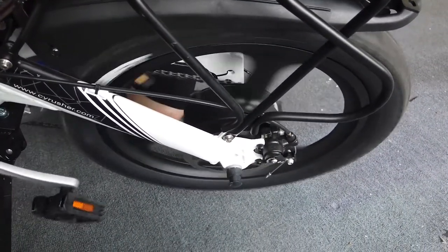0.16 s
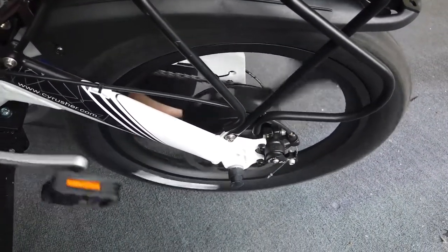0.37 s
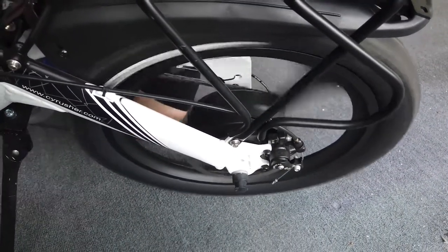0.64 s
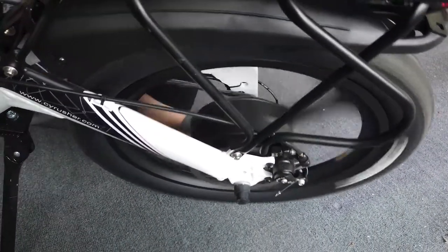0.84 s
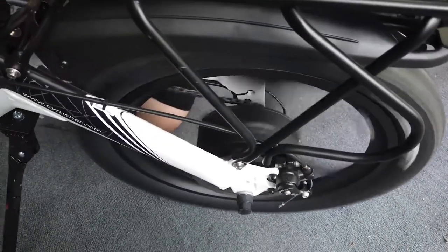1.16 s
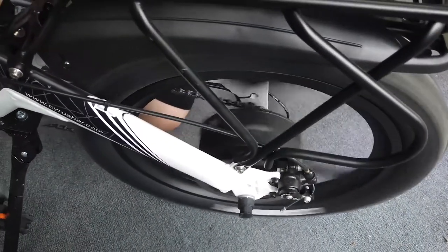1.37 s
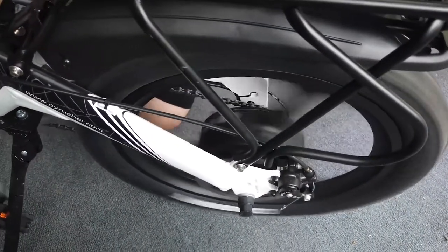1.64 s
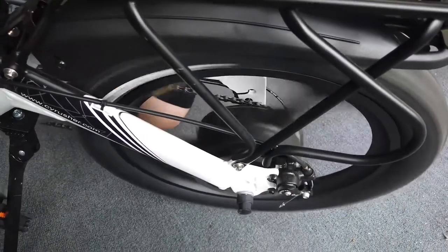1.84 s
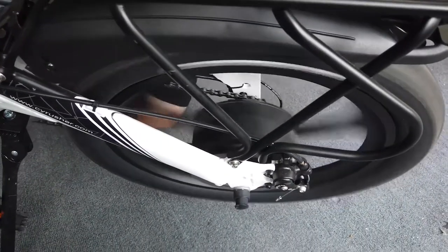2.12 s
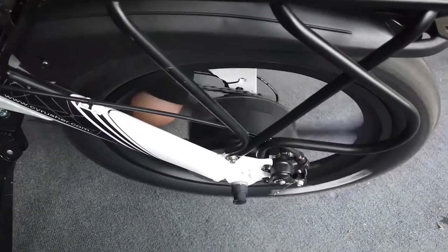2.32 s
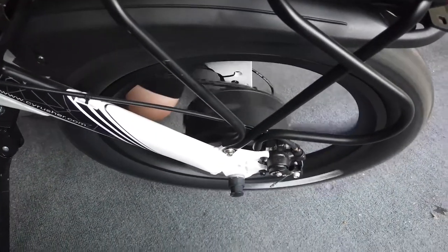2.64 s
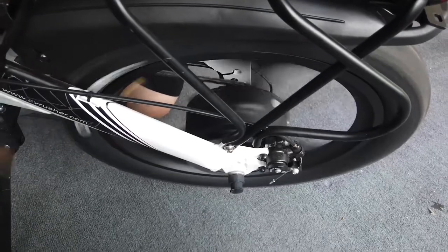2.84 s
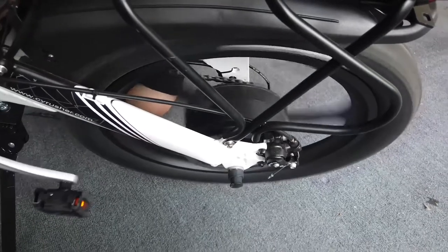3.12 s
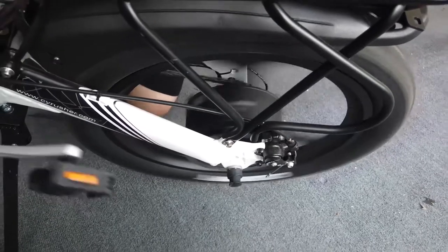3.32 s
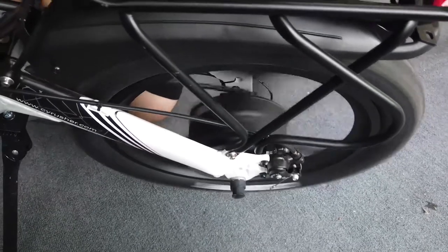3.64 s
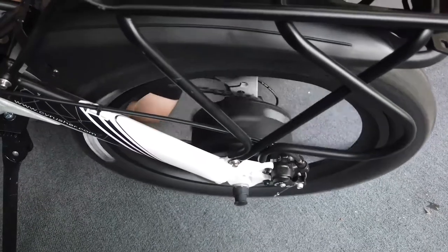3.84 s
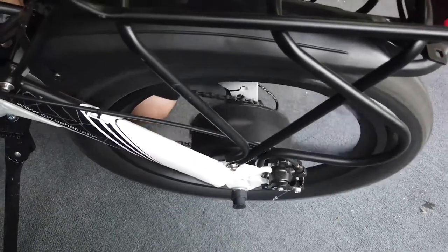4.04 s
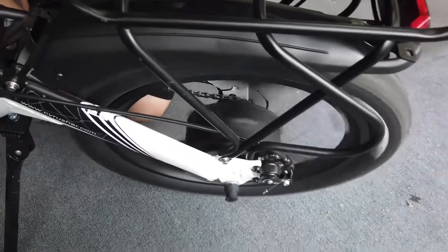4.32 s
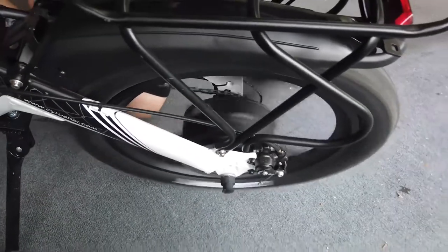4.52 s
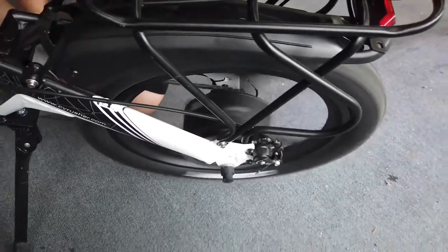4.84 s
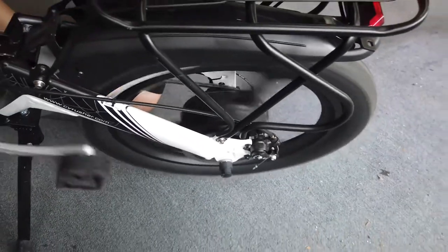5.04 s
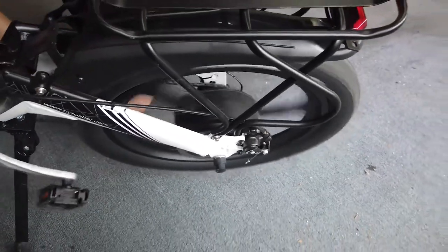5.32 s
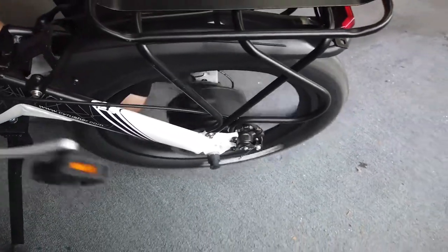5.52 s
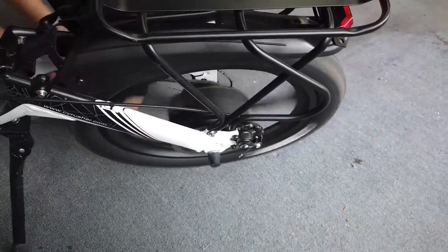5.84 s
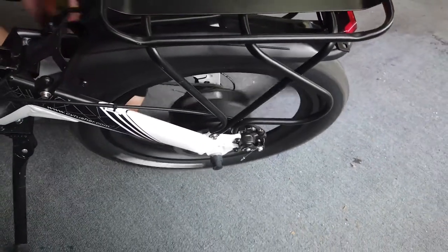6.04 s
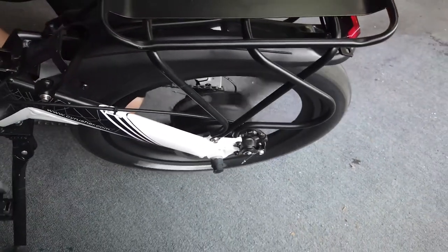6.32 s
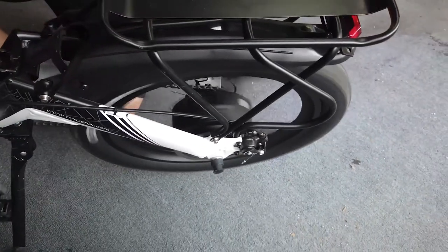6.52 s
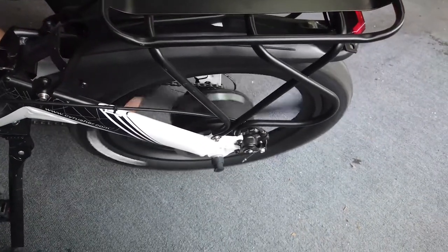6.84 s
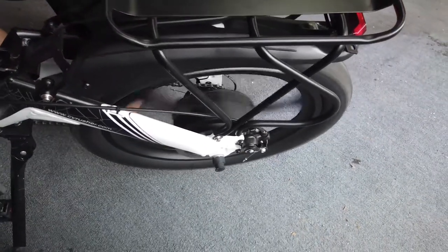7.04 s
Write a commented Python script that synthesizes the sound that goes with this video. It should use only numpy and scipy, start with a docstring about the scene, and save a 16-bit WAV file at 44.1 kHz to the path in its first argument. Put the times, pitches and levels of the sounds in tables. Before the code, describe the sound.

The rear wheel of an electric bike spins on a stand in a small, hard room, heard from close by. The chain rattles and the hub motor whirs with a thin whine, then coasts. The freewheel buzzes in three runs, its clicking speeding up and slowing down in the first two. Metal clanks from chain and cranks come as the drive catches, loudest before the last run, over a low rumble.

```python
"""A geared hub motor whirs and a chain rattles over a low rumble: the rear wheel of an electric bike
spins on its stand in a small hard room. The motor whines under load, then coasts. Three times the
freewheel runs free and its pawls buzz over the ratchet teeth, twice as fast when the pedals turn
backwards. Chain and cranks clank through the frame as the drive catches and lets go."""
import sys
import numpy as np
from scipy import signal
from scipy.fft import rfft, irfft, next_fast_len
from scipy.io import wavfile
from scipy.ndimage import map_coordinates

SR = 44100
rng = np.random.default_rng(int(sys.argv[2]) if len(sys.argv) > 2 else 0)


def put_to_file(sound):
    """Save the sound as 16-bit audio at rate SR, in the file named by the first command-line argument."""
    columns = np.atleast_2d(sound).T  # one column per channel
    safe = np.clip(columns, -1, 1)
    whole_steps = np.round(safe * 32767)
    wavfile.write(sys.argv[1], SR, whole_steps.astype(np.int16))


N = 316638


def amp(db):
    """Decibels to gain."""
    return 10 ** (np.asarray(db) / 20)


def unit(x):
    """x at rms 1."""
    return x / np.sqrt(np.mean(x ** 2) + 1e-20)


def along(points, hz):
    """Read (freq_hz, value) breakpoints on a log frequency axis."""
    freqs, values = np.transpose(points)
    return np.interp(np.log(hz + 1), np.log(freqs + 1), values)


def curves(rows):
    """One automation curve for each column after the time."""
    times, *columns = np.transpose(rows)
    return [np.interp(np.arange(N) / SR, times, column) for column in columns]


def swell(start, attack, hold, t60):
    """An envelope that rises, holds and dies away."""
    t = np.arange(N) / SR - start
    return np.clip(t / attack, 0, 1) * amp(-60 * np.maximum(t - attack - hold, 0) / t60)


def levels(rows):
    """One envelope per dB column after (start, attack, hold, t60); overlapping swells add in power."""
    rows = np.array(rows)
    shapes = np.array([swell(*row) for row in rows[:, :4]])
    return np.sqrt(amp(rows[:, 4:].T) ** 2 @ shapes ** 2)


def wobble(rate):
    """A smooth random curve, rate knots a second."""
    knots = rng.standard_normal(int(N * rate / SR) + 4)
    return map_coordinates(knots, [np.arange(N) * rate / SR])


def tone(hz, waver_hz, rate):
    """A sine whose pitch wavers, in mid and side."""
    pitch = hz + waver_hz * np.array([wobble(rate), wobble(rate)])
    return np.sqrt(2) * np.sin(2 * np.pi * (np.cumsum(pitch, axis=1) / SR + rng.random((2, 1))))


def bursts(starts, sizes, t60, rise=0.00035):
    """A short burst of noise (mid and side) at each start sample."""
    blows = np.bincount(np.clip(starts, 0, N - 1).astype(int), sizes, N)
    t = np.arange(SR // 10) / SR
    fade = amp(-60 * t / t60) * (1 - np.exp(-t / rise)) ** 2
    return signal.oaconvolve(blows, fade / fade.max())[:N] * rng.standard_normal((2, N))


def contacts(scatter_db, count=9000, t60=0.0076):
    """Dense small impacts, uneven in time and strength."""
    return bursts(rng.uniform(0, N, count), amp(scatter_db * rng.standard_normal(count)), t60)


def filtered(x, gain):
    """Equalise x with a gain that is a function of frequency."""
    n = x.shape[-1]
    size = next_fast_len(n + SR // 8)
    return irfft(rfft(x, size) * gain(np.fft.rfftfreq(size, 1 / SR)), size)[..., :n]


def resonate(x, modes, size=4096):
    """x rings a body with steep-sided modes; their levels set only the balance between them."""
    hz = np.fft.rfftfreq(size, 1 / SR)
    power = sum((amp(db) * (hz * width) ** 2 / ((centre ** 2 - hz ** 2) ** 2 + (hz * width) ** 2)) ** 2
                for centre, width, db in modes)
    # minimum phase, so the ring never comes before the blow
    cepstrum = irfft(np.log(power / power.max() + 1e-10) / 2)
    cepstrum[1:size // 2] *= 2
    cepstrum[size // 2 + 1:] = 0
    ring = irfft(np.exp(rfft(cepstrum)))
    return signal.oaconvolve(x, ring[None] / np.linalg.norm(ring), axes=1)[:, :x.shape[1]]


def wavering(x, modes, tilt_db=0, waver_db=2.5):
    """x rings modes that each wax and wane on their own, summed to rms 1. The tilt is per octave."""
    centre = np.mean([hz for hz, *_ in modes])
    ring = np.zeros((2, N))
    for hz, width, db in modes:
        gain = amp(db + tilt_db * np.log2(hz / centre) + waver_db * wobble(20))
        ring += gain * resonate(x * rng.choice([-1, 1], N), [(hz, width, 0)])
    return unit(ring)


# Reverb time of the hard room: freq_hz, t60_s
ROOM_DECAY = [(150, 1), (700, 0.46), (2000, 0.78), (4000, 0.53), (8000, 0.077), (16000, 0.39)]

def room(x, count=12):
    """The walls answer, each frequency dying at its own speed; crossfaded tails make the echoes drift."""
    hop = N // count + 1
    wet = np.zeros((2, N + 3 * SR))
    padded = np.pad(x, ((0, 0), (hop, 2 * hop)))
    hz, t, noise = signal.stft(rng.standard_normal((count + 1, 2, SR * 3 // 4)), SR, nperseg=256)
    tails = signal.istft(noise * amp(-60 * t / along(ROOM_DECAY, hz)[:, None]), SR, nperseg=256)[1]
    tails /= np.sqrt(np.sum(amp(-120 * np.arange(SR) / SR / along(ROOM_DECAY, 2000))))
    for k, tail in enumerate(tails):
        send = padded[:, k * hop:(k + 2) * hop] * signal.windows.cosine(2 * hop)
        echo = signal.fftconvolve(send, tail, axes=1)
        wet[:, k * hop + SR // 200:][:, :echo.shape[1]] += echo  # 5 ms pre-delay
    return wet[:, hop:hop + N]


# Colour of the room tone before its low cut: freq_hz, relative_db
ROOM_TONE_EQ = [(12, -39), (20, 10), (54, -2.5), (173, -21), (242, -10), (330, -12.5), (585, -18.5),
                (1000, -27), (1300, -19.5), (1930, -32.5), (2380, -20.5), (3000, -67), (3900, -90.5),
                (6600, -120)]
# Colour of the rumble: freq_hz, relative_db
RUMBLE_EQ = [(15, -13.5), (30, -4), (42, 3), (58, -4.5), (90, -10.5), (130, -20), (190, -27), (400, -47.5)]
# Swells of the rumble: start_s, attack_s, hold_s, t60_s, level_db
RUMBLE_SWELLS = [(-0.1, 0.043, 1.36, 7.8, -53), (3.28, 0.082, 0.71, 1.4, -58.5),
                 (4.08, 0.12, 0.02, 0.77, -50), (5.3, 0.021, 0.44, 5.2, -48.5)]

def background(bed_db=-61, waver_db=2.5, air_db=-72):
    """A low rumble swells and sinks under faint, steady room tone."""
    swells, = levels(RUMBLE_SWELLS)
    rumble_gain = np.hypot(amp(bed_db), swells) * amp(waver_db * wobble(5.2))
    rumble = filtered(rng.standard_normal((2, N)),
                      lambda hz: amp(along(RUMBLE_EQ, hz)) * (hz < RUMBLE_EQ[-1][0]))
    air = filtered(rng.standard_normal((2, N)),
                   lambda hz: amp(along(ROOM_TONE_EQ, hz)) * hz ** 2 / (hz ** 2 + 200 ** 2))
    return rumble_gain * unit(rumble) + amp(air_db) * unit(air)


# Deep bumps in the rumble: start_s, pitch_hz, level_db
LOW_BUMPS = [(4.125, 49.3, -37.5), (4.184, 89.3, -43.5), (4.24, 61, -44.5), (4.32, 45.8, -47)]

def bumps():
    """A few deep, short bumps in the rumble, like handling or wind on the microphone."""
    t = np.arange(N) / SR
    return sum(amp(db) * swell(s, attack=0.0185, hold=0.0052, t60=0.2) * np.sin(2 * np.pi * hz * (t - s))
               for s, hz, db in LOW_BUMPS)


# Low resonances of the stand: pitch_hz, width_hz, relative_db
STAND_HUM_MODES = [(239.7, 16, 5), (334, 57, -7.5)]
# Jolts from the drive: start_s, level_db
DRIVE_JOLTS = [(0.238, -63), (0.83, -58), (1.341, -68), (3.64, -64.5)]

def stand(coupling_db=-23):
    """The stand hums in its low modes with the shaking of the gears and with each jolt."""
    shaking = amp(coupling_db) * levels(HUB_WHIRRS)[0]
    jolts = sum(amp(db) * swell(s, attack=0.021, hold=0.061, t60=1) for s, db in DRIVE_JOLTS)
    hum = unit(resonate(rng.standard_normal((2, N)), STAND_HUM_MODES, size=16384))
    return (shaking + jolts) * hum


# Resonances of the chain's links and rollers: pitch_hz, width_hz, relative_db
LINK_MODES = [(1840, 220, 8), (2230, 180, 12), (2500, 41, 11), (2666, 68, 2), (2910, 91, 3),
              (3177, 60, -7.5), (3900, 80, -24), (4100, 80, -17)]
ROLLER_MODES = [(4110, 55, -0.5), (8900, 340, -2.5), (10800, 560, 14.5), (14700, 630, -13.5)]
# Pulls on the chain: start_s, attack_s, hold_s, t60_s, rattle_db, sizzle_db
CHAIN_PULLS = [(-0.03, 0.027, 0.0041, 0.42, -49, -110), (0.35, 0.28, 0.11, 0.4, -102, -88),
               (0.68, 0.065, 0.68, 0.15, -61, -79), (0.85, 0.074, 0.085, 1.2, -71, -65.5),
               (3.45, 0.12, 0.48, 0.3, -99, -96.5), (5.55, 0.074, 0.028, 1.4, -53.5, -100),
               (5.74, 0.05, 0.26, 4.6, -70.5, -115)]

def chain():
    """Links rattle over the sprockets and their rollers sizzle."""
    rattle_gain, sizzle_gain = levels(CHAIN_PULLS)
    ticks = contacts(scatter_db=1.0, count=4000, t60=0.016)
    rattle = rattle_gain * unit(resonate(ticks, LINK_MODES))
    sizzle = sizzle_gain * unit(resonate(ticks, ROLLER_MODES))
    return rattle + sizzle + amp(-6.0) * room(rattle + sizzle)


# Resonances of the frame: pitch_hz, width_hz, relative_db
FRAME_MODES = [(178, 170, 8), (350, 440, 5.5), (476, 46, 11.5), (750, 330, 2.5), (890, 160, 3.5),
               (1265, 190, 4), (1580, 62, -7), (1736, 410, 3), (1940, 240, 0), (2030, 390, -0.5),
               (2373, 140, 9.5), (2640, 95, -20), (3170, 790, -2), (3940, 270, -2.5), (4630, 110, -4),
               (5600, 440, -18), (5670, 460, -9.5), (7200, 1500, -17)]
# Hits of chain and crank: start_s, clatter_db, centre_hz, spread_octaves, t60_s, send_db, thud_db
DRIVE_CLANKS = [(0.794, -45, 1130, 0.5, 0.087, 5, -51.5), (1.387, -33, 796, 0.75, 0.062, -1.5, -59),
                (1.448, -28, 1390, 1, 0.014, -15.5, -52.5), (3.283, -48, 2270, 0.096, 0.059, -17, -77),
                (3.321, -37, 1970, 0.19, 0.097, -22, -37.5), (3.342, -41.5, 1230, 0.36, 0.11, -26, -60),
                (3.373, -44, 2140, 0.081, 0.027, 1.5, -63), (3.851, -56.5, 1167, 0.22, 0.078, -1, -84),
                (3.883, -61, 1850, 0.26, 0.14, -8.5, -74), (3.984, -45, 1755, 0.061, 0.04, -10, -85),
                (4.041, -47.5, 900, 0.9, 0.13, 4.5, -58.5), (4.345, -54, 474, 0.4, 0.15, -11.5, -64),
                (4.785, -55.5, 864, 0.6, 0.1, -4.5, -70.5), (5.301, -20.5, 4100, 0.7, 0.017, 1.5, -44),
                (5.304, -31.5, 1500, 0.18, 0.12, -24, -51.5), (5.326, -49, 516, 0.77, 0.089, -9.5, -42),
                (5.354, -39, 1300, 1, 0.065, -14.5, -41.5), (5.488, -18, 2100, 0.77, 0.017, 1.5, -51.5),
                (5.492, -18.5, 1360, 0.9, 0.04, 0.5, -37.5), (5.513, -26, 1470, 0.3, 0.038, -24, -47),
                (5.524, -28.5, 1490, 0.87, 0.04, -3.5, -42), (6.263, -42.5, 2380, 0.12, 0.043, 8.5, -67),
                (6.299, -25, 1100, 1.1, 0.042, 2.5, -39), (6.315, -27, 1690, 0.7, 0.036, -27, -45),
                (6.359, -39.5, 796, 1.12, 0.07, 6, -55), (7.02, -64.5, 696, 0.33, 0.14, 9, -70)]

def clanks(makeup_db=4.0, thud_lag_s=0.0067):
    """Clattering links ring one band of the frame, then a low thud follows; makeup_db lifts both."""
    direct, send = np.zeros((2, 2, N + SR))
    t = np.arange(SR // 3) / SR

    def strike(s, db, centre_hz, octaves, t60, send_db):
        """One blow on the frame, and its reverb send."""
        frame = resonate(rng.standard_normal((2, len(t))), FRAME_MODES)
        band = filtered(frame, lambda hz: np.exp(-(np.log2((hz + 1) / centre_hz) / octaves) ** 2 / 2))
        blow = unit(band) * amp(db + makeup_db - 60 * t / t60) * (1 - np.exp(-t / 0.0017))
        direct[:, round(s * SR):][:, :len(t)] += blow
        send[:, round(s * SR):][:, :len(t)] += amp(send_db) * blow

    for s, clatter_db, centre_hz, octaves, t60, send_db, thud_db in DRIVE_CLANKS:
        strike(s, clatter_db, centre_hz, octaves, t60, send_db)
        strike(s + thud_lag_s, thud_db, centre_hz=480, octaves=1, t60=0.13, send_db=-17.5)
    return direct[:, :N] + room(send[:, :N])


# Partials of the crank: pitch_hz, relative_db, t60_s
CRANK_MODES = [(475, -12.5, 0.2), (951, -3, 0.25), (1247, -6.5, 0.257), (1550, -12, 0.2),
               (1753, -7.5, 0.25), (1830, -7.5, 0.34), (1906, 2.5, 0.15), (2362, -12.5, 0.12),
               (4086, -8, 0.094)]
# Hard catches of the drive: start_s, strength_db
DRIVE_CATCHES = [(5.303, -48), (5.492, -23.5), (6.3, -43)]

def crank():
    """The hardest catches leave the crank ringing in its own modes."""
    ring = np.zeros((2, N))
    for hz, mode_db, t60 in CRANK_MODES:
        envelope = sum(amp(db + mode_db) * swell(s, 0.002, 0, t60) for s, db in DRIVE_CATCHES)
        ring += envelope * tone(hz, waver_hz=34.24, rate=160)
    return ring * amp([[-3], [-6]])  # mid and side trims


# Path of the motor's whine: time_s, base_hz, lower_db, upper_db
WHINE_PATH = [(0.45, 1281, -80, -89), (0.7, 1300, -57.5, -82), (0.87, 1296, -60, -74),
              (1.06, 1316, -52.5, -66.5), (1.2, 1258, -52, -66.5), (1.33, 1318, -52, -66.5),
              (1.52, 1280, -49.5, -59.5), (1.65, 1297, -67.5, -77.5), (1.9, 1327, -54, -58),
              (2.25, 1305, -62, -61.5), (2.45, 1289, -56.5, -48.5), (2.75, 1258, -57, -56.5),
              (3.1, 1239, -64, -66.5), (3.3, 1220, -96, -98.5)]

def whine(waver_db=3.5):
    """Two narrow, unsteady tones follow the speed of the motor and sink as the wheel coasts."""
    base_hz, lower_db, upper_db = curves(WHINE_PATH)
    return sum(amp(db + waver_db * wobble(30)) * tone(ratio * base_hz, waver_hz=24.18, rate=80)
               for ratio, db in [(0.99, lower_db), (1.315, upper_db)])


# Resonances of gear housing, wheel and hub shell: pitch_hz, width_hz, relative_db
HOUSING_MODES = [(252, 75, -16.5), (467, 116, 1.5), (613, 33, 1), (856, 140, 1.5), (1027, 120, 2.5),
                 (1411, 140, -2), (1600, 150, -29), (2000, 100, -24.5), (2820, 640, -52)]
WHEEL_MODES = [(696, 155, -3.5), (805, 65, -12.5)]
SHELL_MODES = [(1129, 110, -1), (1215, 74, -2), (1280, 42, -1.5), (1361.5, 73, 0.5), (1474, 66, -5),
               (1652, 120, -2.5), (1722, 50, -6.5)]
# Bursts of whirr from the hub: start_s, attack_s, hold_s, t60_s, gears_db, wheel_db, shell_db
HUB_WHIRRS = [(-0.03, 0.012, 0.019, 0.95, -44, -49.5, -44.5), (0.0, 0.1, 0.89, 8.2, -57, -78, -67.5),
              (0.62, 0.57, 0.31, 3.25, -50, -54.5, -46), (1.4, 0.42, 0.83, 1.98, -81, -59, -50.5),
              (3.55, 0.2, 0.12, 0.66, -76, -76.5, -72), (4.03, 0.12, 0.11, 2.4, -58.5, -74, -74.5),
              (4.6, 0.096, 0.083, 7.1, -72.5, -74, -70), (5.6, 0.086, 0.049, 3.56, -64.5, -60.5, -74),
              (6.35, 0.21, 0.068, 0.46, -56.5, -52, -65), (6.85, 0.096, 0.033, 0.92, -68.5, -63.5, -69)]

def motor():
    """Gear teeth rattle unevenly into the housing; the wheel drones and the hub shell sings along."""
    gear_gain, wheel_gain, shell_gain = levels(HUB_WHIRRS)
    gears = gear_gain * unit(resonate(contacts(scatter_db=3.0), HOUSING_MODES))
    wheel = wheel_gain * unit(resonate(contacts(scatter_db=2.5), WHEEL_MODES))
    shell = shell_gain * wavering(contacts(scatter_db=0.5), SHELL_MODES)
    whirr = gears + wheel + shell
    return whirr + amp(-3.5) * room(whirr)


# Moments when the freewheel body sings out: peak_s, pitch_hz, level_db
BODY_FLARES = [(2.5, 2350, -38.5), (2.63, 2350, -46.5), (2.819, 2342, -37), (2.91, 2320, -47),
               (3.15, 2384, -44), (4.43, 2370, -44.5), (4.73, 2280, -41), (4.888, 1820, -44.5),
               (5.06, 2335, -42.5)]

def flares(clicks, half_length_s=0.037, width_hz=216):
    """The clicks briefly drive one mode of the freewheel body into a loud ring."""
    t = np.arange(N) / SR
    ring = np.zeros((2, N))
    for s, hz, db in BODY_FLARES:
        envelope = amp(db) * np.exp(-((t - s) / half_length_s) ** 2)
        ring += envelope * unit(resonate(clicks, [(hz, width_hz, 0)]))
    return ring


# Accents where a pawl drops hard: start_s, body_drive_db, steel_drive_db
HARD_DROPS = [(1.202, -46.5, -40), (1.231, -42, -47), (1.254, -39, -57), (1.28, -42.5, -51),
              (1.3, -41, -38), (1.380, -43, -38), (1.429, -41, -36), (1.447, -36, -36), (1.506, -38.5, -32),
              (1.549, -40, -35), (1.597, -41, -34), (1.686, -36.5, -34), (1.838, -40.5, -36),
              (1.901, -42, -38), (1.962, -43, -50.5), (1.976, -35.5, -47), (2.12, -41.5, -49),
              (2.183, -38.5, -38), (2.302, -41, -46), (2.457, -44, -31.5), (3.985, -77, -60),
              (4.099, -40, -51), (4.114, -37, -49), (4.244, -40.5, -53), (4.393, -39.5, -52),
              (4.405, -50, -59), (4.452, -42, -57), (4.552, -40, -45), (4.769, -45, -29), (6.634, -42, -50),
              (6.645, -35, -40), (6.916, -43, -41)]

def snaps():
    """A hard drop cracks through the freewheel body, the ratchet ring and the pawl's own steel."""
    s, body_db, steel_db = np.transpose(HARD_DROPS)
    parts = [(body_db, BODY_MODES), (body_db - 10, RATCHET_MODES), (steel_db - 4, PAWL_MODES)]
    return sum(resonate(bursts(s * SR, amp(db), t60=0.023, rise=0.0009), modes) for db, modes in parts)


def ratchet_teeth(rate):
    """The samples at which a tooth passes, nudged so that every hard drop falls on a tooth."""
    passed = np.cumsum(rate) / SR
    hard = np.sort([s * SR for s, *_ in HARD_DROPS])
    slip = np.unwrap(np.interp(hard, np.arange(N), passed) % 1, period=1)
    aligned = passed - np.interp(np.arange(N), hard, slip)
    return np.flatnonzero(np.diff(np.floor(aligned)) > 0)


# Runs where the wheel overruns the chain: start_s, end_s, attack_s, release_s, ring_db,
# tilt_db_per_octave, hiss_db, rasp_db, ping_db, bite_db, wheel_hz, sway_peak_s, ping_peak_s
FREE_RUNS = [(1.13, 3.327, 0.067, 0.29, -49, 3.5, -48.5, -60.5, -58, 7.5, 3.28, 2.005, 1.7),
             (3.942, 5.557, 0.19, 0.25, -46.5, -5.5, -49, -59.5, -56.5, -1, 3.15, 4.73, 3.6),
             (6.189, 7.423, 0.11, 0.31, -46.5, 4.5, -50.5, -65.5, -55, 5.5, 3.62, 5.5, 6.66)]

def pawl_controls(rate, bite_s=0.45, slowing_per_s=0.1):
    """Gains of ring, hiss, rasp and ping, and the body's tilt; the untrue wheel sways the levels."""
    t = np.arange(N) / SR
    octaves = np.log2(rate / np.median(rate))  # faster clicks: more hiss and ping, less rasp
    controls = np.zeros((5, N))
    for (start, end, attack, release, ring_db, tilt_db, hiss_db, rasp_db, ping_db,
         bite_db, wheel_hz, sway_peak_s, ping_peak_s) in FREE_RUNS:
        fade_out = np.clip((end - t) / release, 0, 1)
        fade = lambda rise: (np.clip((t - start) / rise, 0, 1) * fade_out) ** 2.05
        angle = lambda s: 2 * np.pi * wheel_hz * (t - s) * (1 - slowing_per_s * (t - s) / 2)
        # ring, rasp and ping swell once, twice and three times a turn
        ring_sway_db = 1.8 * np.cos(angle(sway_peak_s))
        rasp_sway_db = 3.5 * np.cos(2 * angle(sway_peak_s))
        ping_sway_db = 3 * np.cos(3 * angle(ping_peak_s))
        bite = bite_db * np.exp(-((t - start) / bite_s) ** 2)  # trades ping for rasp as a run opens
        late_fade = fade(attack * 1.66)
        controls += [fade(attack) * amp(ring_db + ring_sway_db),
                     late_fade * amp(hiss_db + 0.5 * octaves),
                     late_fade * amp(rasp_db - octaves + rasp_sway_db + bite),
                     late_fade * amp(ping_db + 0.5 * octaves + ping_sway_db - bite / 2),
                     tilt_db * ((t > start) & (t < end))]
    return controls


# Resonances of freewheel body, ratchet ring, steel pawls and spring: pitch_hz, width_hz, relative_db
BODY_MODES = [(1822, 197, -6), (2080, 270, -4.5), (2352, 270, 0), (2676, 370, -1)]
RATCHET_MODES = [(3216, 350, 0), (3850, 200, -3), (4037, 190, 1), (4392, 92, -3.5)]
PAWL_MODES = [(6755, 200, -15), (8140, 283, 5.5), (8500, 400, 4.5), (8930, 350, 2), (9870, 450, 3.5),
              (10540, 630, 4), (10920, 620, 5), (11600, 430, 3.5), (12050, 780, 6.5), (14400, 810, -8.5),
              (15150, 1500, 1.5), (15650, 610, 0)]
SPRING_MODES = [(4475, 57, -11), (5573, 130, -3), (5780, 150, 2.5), (5897, 180, -0.5)]
# Speed of the freewheel through its three runs: time_s, teeth_per_s
TOOTH_RATE = [(1.17, 28), (1.3, 43), (1.48, 68), (2.2, 63), (2.33, 94), (2.55, 120), (2.88, 138),
              (3.03, 126), (3.15, 92), (3.3, 30), (3.98, 28), (4.1, 62), (4.18, 71), (4.45, 66), (4.57, 82),
              (4.7, 130), (4.85, 152), (5.1, 137), (5.25, 112), (5.5, 27), (6.17, 28), (6.35, 75),
              (7.18, 68)]

def freewheel(second_lag_teeth=0.46, second_db=-9.5):
    """Two pawls drop off each ratchet tooth and scrape up the next; faster clicks run together."""
    rate, = curves(TOOTH_RATE)
    ring_gain, hiss_gain, rasp_gain, ping_gain, tilt = pawl_controls(rate)
    teeth = ratchet_teeth(rate)
    scatter = rng.standard_normal((len(teeth), 6)).T
    jitter, body_scatter, tip_scatter, lag_scatter, second_scatter, drop_scatter = scatter
    first_pawl = teeth + 0.0002 * SR * jitter
    second_pawl = teeth + SR / rate[teeth] * (second_lag_teeth + 0.057 * lag_scatter)
    size = 1 / np.sqrt(rate[teeth])  # even power at any speed
    scrape = 0.32 * (rate / np.median(rate)) ** 0.9

    def clicks(scatter_db):
        """The drops of both pawls, uneven in strength."""
        sizes = np.r_[size * amp(scatter_db), size * amp(second_db + 3 * second_scatter)]
        return unit(bursts(np.r_[first_pawl, second_pawl], sizes, t60=0.019, rise=0.0022))

    body = clicks(1.1 * body_scatter) + scrape * rng.standard_normal((2, N))
    tips = clicks(1.2 * tip_scatter) + 2.2 * scrape * rng.standard_normal((2, N))
    drops = clicks(1.4 * drop_scatter)
    ring = ring_gain * wavering(body, BODY_MODES, tilt_db=tilt)
    rasp = rasp_gain * wavering(drops, RATCHET_MODES)
    hiss = hiss_gain * amp(1.3 * wobble(22)) * unit(resonate(tips, PAWL_MODES))
    ping = ping_gain * wavering(drops, SPRING_MODES)
    buzz = ring + rasp + ping + hiss + snaps()
    return buzz + amp(-2.0) * room(buzz) + flares(body)


# Stereo width: freq_hz, side_gain_db
STEREO_WIDTH = [(60, -21), (200, -23), (500, -15.5), (800, -15.5), (1300, -11.5), (2300, -2), (4400, 0),
                (15000, -2.5)]

def scene():
    """The mix: the bass sits near the centre, the treble comes from all sides."""
    mid, side = (freewheel() + motor() + whine() + chain() + clanks() + crank()
                 + stand() + bumps() + background())
    side = filtered(side, lambda hz: amp(along(STEREO_WIDTH, hz)))
    return np.array([mid + side, mid - side])


def record(dry):
    """A brick-wall low-pass takes off the very top."""
    cutoff_hz = 15850
    return filtered(dry, lambda hz: 1 / (1 + (hz / cutoff_hz) ** 300))


dry = scene()
out = record(dry)
put_to_file(out)
```